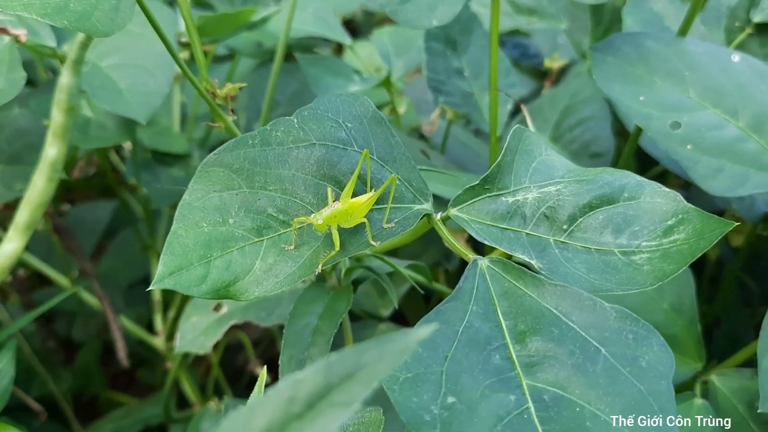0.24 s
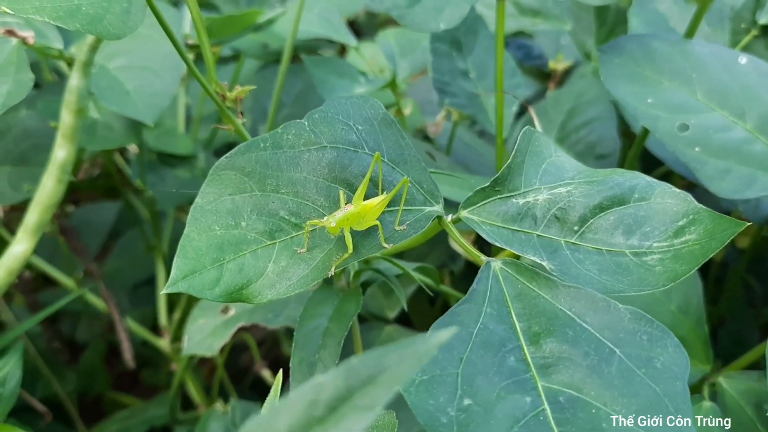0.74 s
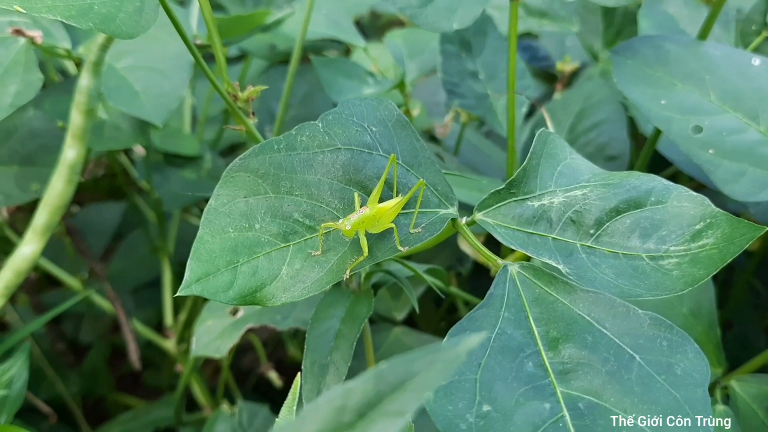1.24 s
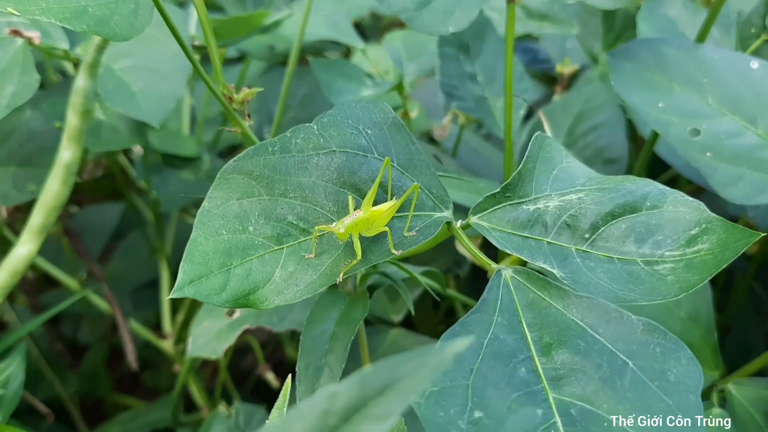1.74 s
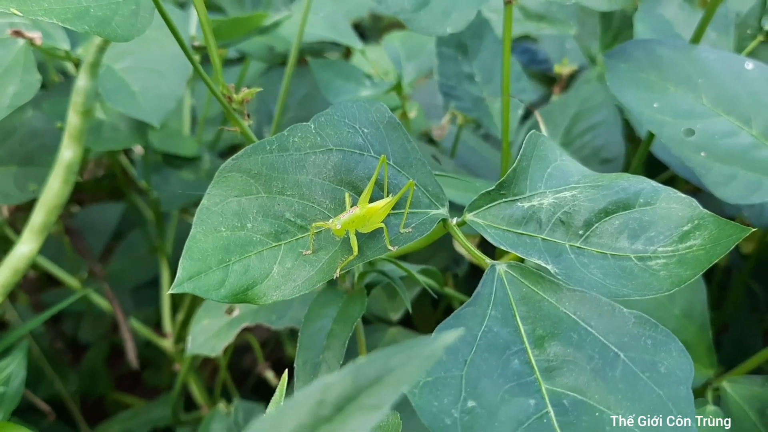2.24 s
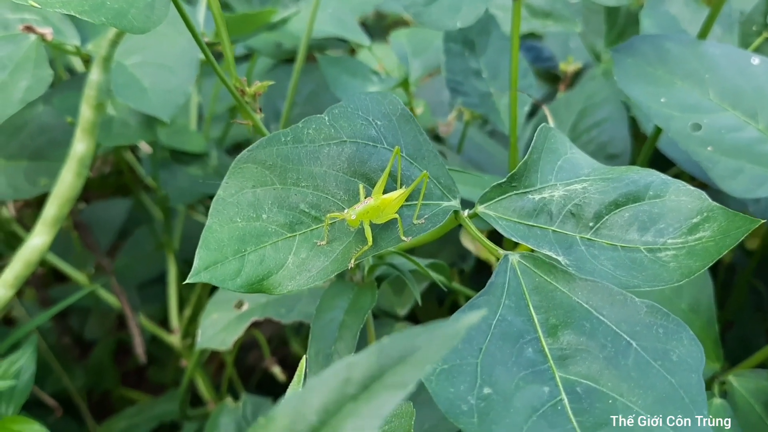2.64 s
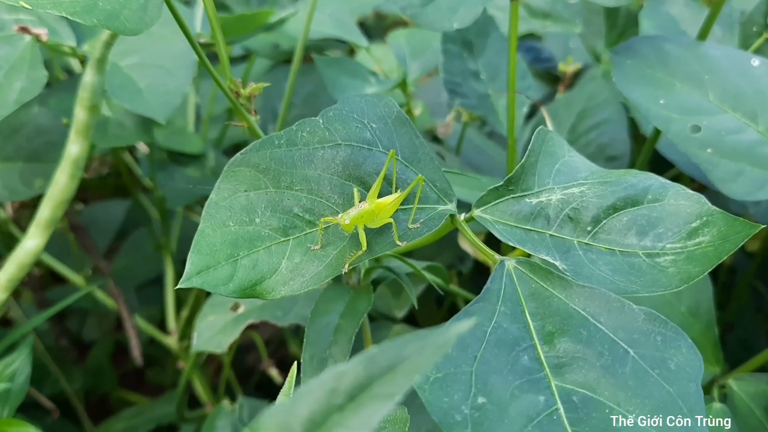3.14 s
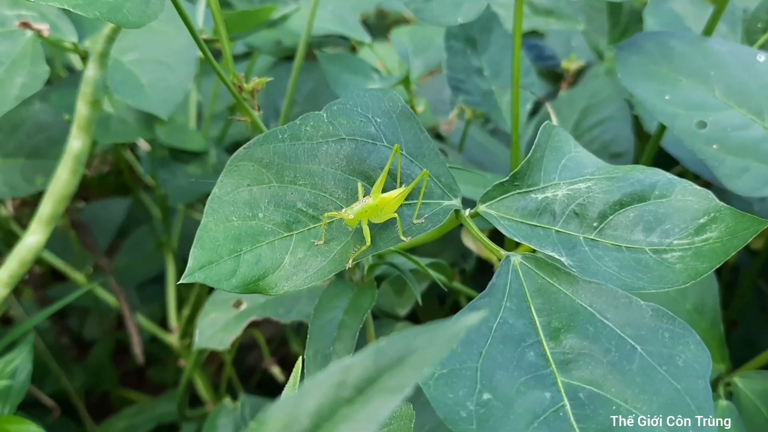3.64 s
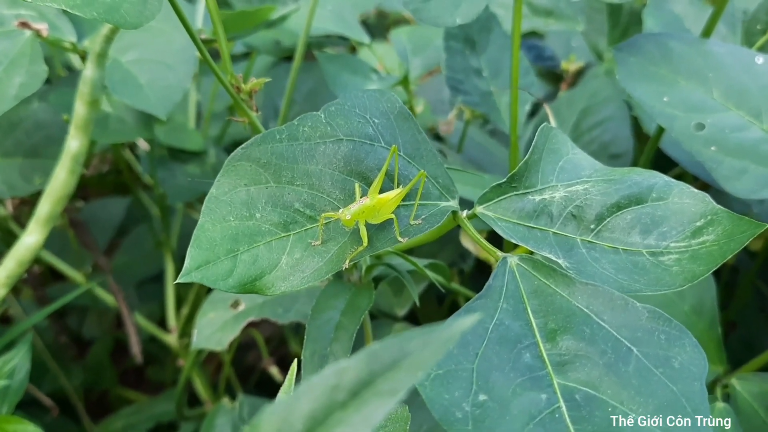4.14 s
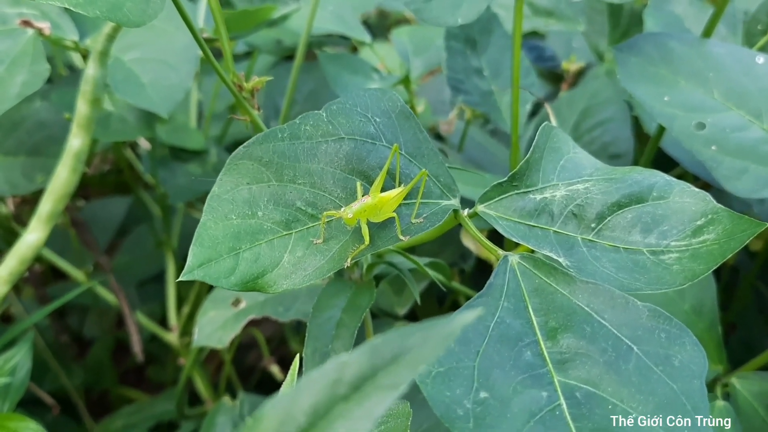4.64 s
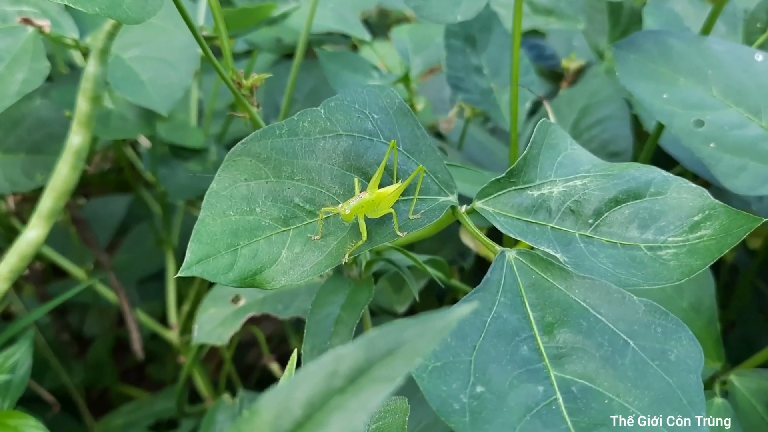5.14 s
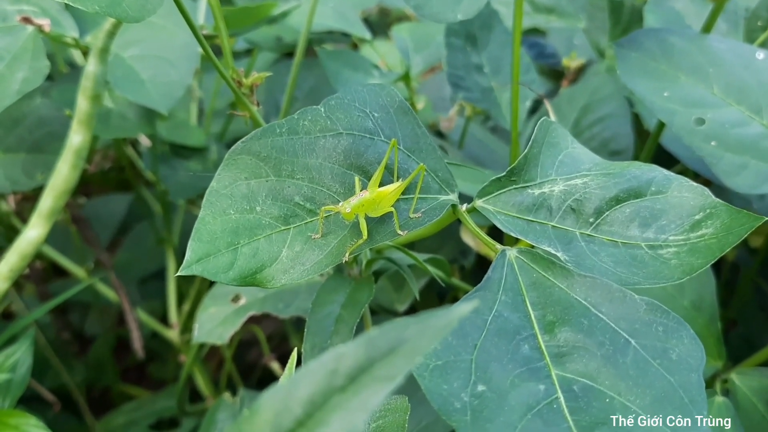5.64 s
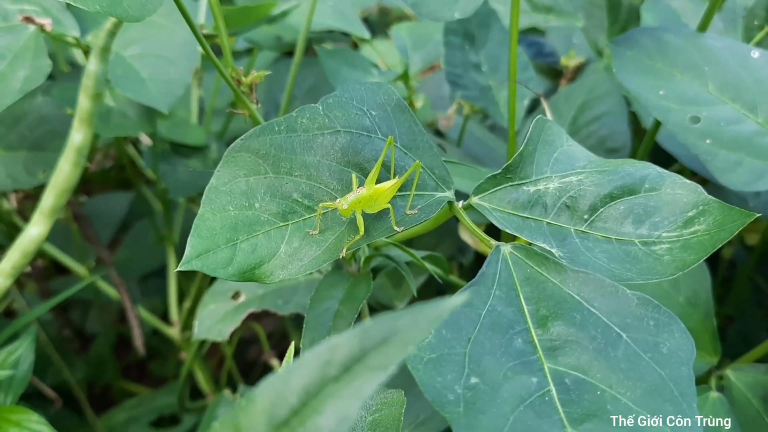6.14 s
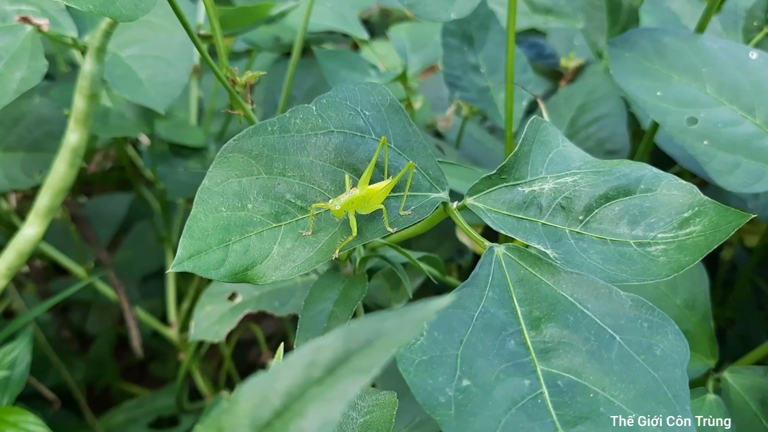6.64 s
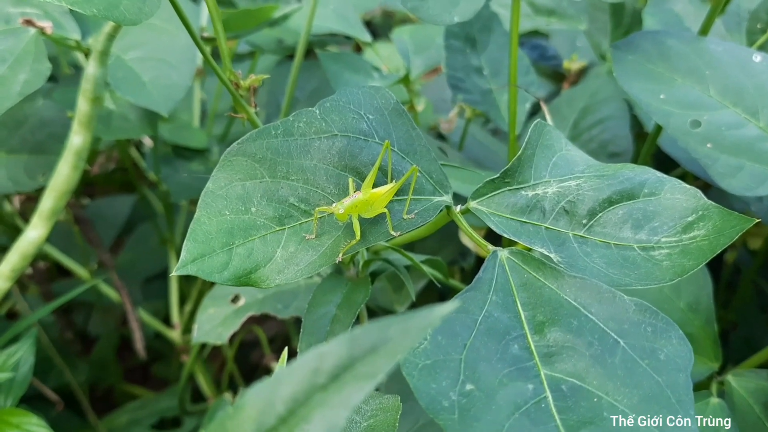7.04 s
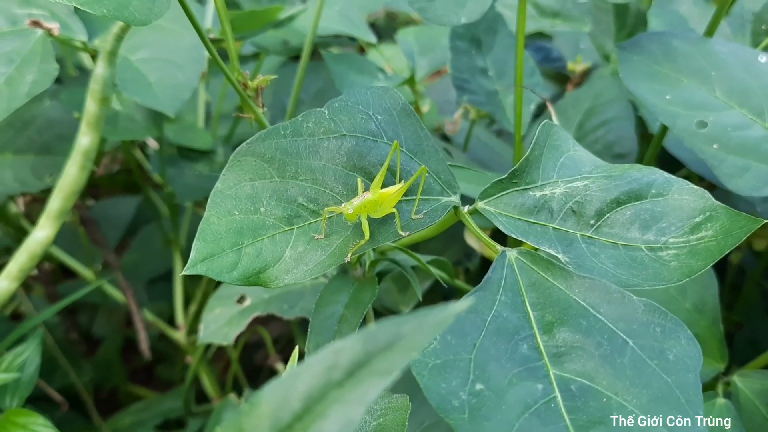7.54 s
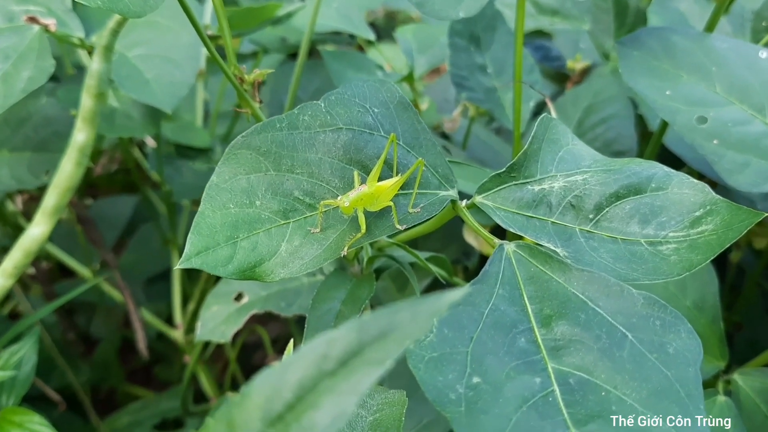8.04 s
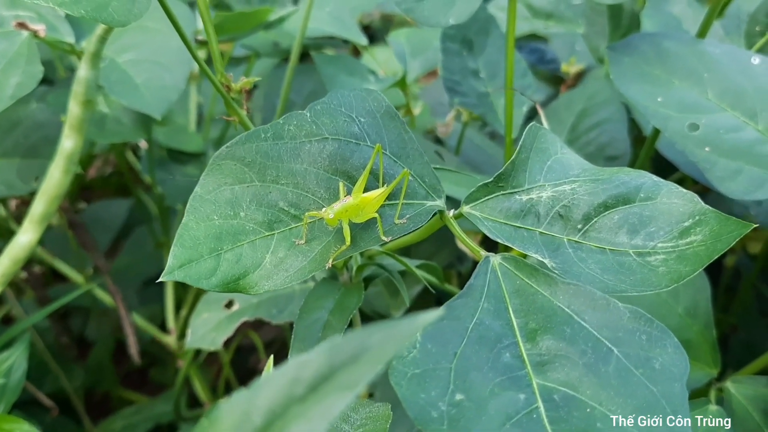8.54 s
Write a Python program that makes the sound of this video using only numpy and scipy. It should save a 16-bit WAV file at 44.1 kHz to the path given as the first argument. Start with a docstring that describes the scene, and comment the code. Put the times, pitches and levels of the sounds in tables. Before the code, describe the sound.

Bright overlapping insect trills and dry, hissy katydid buzzing fill leafy outdoor air, with small leaf rustles and a distant wavering hum.

```python
"""Crickets trill in a garden at close and middle range, each stroke a short near-sine arch of sagging pitch.
Two katydids buzz above: dense random ticks excite broad wing resonances. A far chorus blurs behind them by
scattering, over a lower band of ringing ticks. Leaves rustle now and then as bursts of grainy noise; a far bird
gives hoarse falling glides. A distant motor hum, a wavering sine, swells over low traffic-like rumble made of
filtered noise, and one soft low tone swells and fades. A handheld pair of microphones hears it in stereo."""
import sys
import numpy as np
from scipy import signal
from scipy.fft import rfft, irfft
from scipy.io import wavfile
from scipy.ndimage import uniform_filter1d

SR = 44100
rng = np.random.default_rng(int(sys.argv[2]) if len(sys.argv) > 2 else 0)


def master_out(mix):
    """Clip the mix to full scale and print it as 16-bit PCM to the path in sys.argv[1]."""
    frames = np.transpose(np.atleast_2d(mix))
    ceiling = np.clip(frames, -1, 1)
    pcm = np.round(ceiling * 32767).astype(np.int16)
    wavfile.write(sys.argv[1], SR, pcm)


def natural_amplitude(level_db):
    """Convert a level in decibels to a linear amplitude factor, elementwise."""
    exponent = np.asarray(level_db, float) / 20
    return 10 ** exponent


N = 387462

# Place and wing stroke of six crickets. Each row: left-right level in dB, phase lead of the left in radians,
# delay of the right in ms, strokes per s, stroke length in ms, flatness of the stroke's top.
CRICKETS = [(-17, -2.3, 0, 26.4, 18.0, 1.3), (-4, -2.4, 2.8, 28.95, 20.0, .9),
            (-3, 2.5, 0, 27.5, 20.0, 1.2), (4, 2.1, 0, 26.18, 20.0, 1.2), (-1.5, -2.1, 0, 27.75, 20.0, 1.2),
            (-3.5, -.6, 0, 26.07, 20.0, 1.2)]
# Pitches of the six crickets in Hz.
CRICKET_PITCHES_HZ = [7735.0, 8178.0, 7580.0, 7366.0, 7742.0, 7893.0]
# Trills, one list a cricket. Each row: first full stroke in seconds, last stroke in seconds,
# stroke peak in dB at the start, stroke peak in dB at the end.
TRILLS = [
    [(0.0306, 0.7122, -30.5, -30.5), (1.1657, 5.028, -31.5, -29), (5.4474, 7.0405, -29.5, -30)],
    [(0.0255, 0.7517, -36, -36), (1.3098, 4.4914, -37, -36), (4.9511, 7.1934, -36, -35)],
    [(0.017, 2.4184, -38, -37.5), (3.7181, 5.1774, -37, -36.5), (5.3253, 6.5935, -35.5, -35.5),
     (7.2146, 8.3417, -37, -38.5)],
    [(0.6342, 2.4295, -53, -53), (3.2322, 4.6848, -50, -50)],
    [(5.5241, 7.0719, -41.5, -41.5), (7.6135, 8.7683, -44, -44)],
    [(0.0332, 1.2635, -44.5, -44.5), (1.9222, 4.6829, -44.5, -46.5)],
]
# Each stroke leading into a trill is this much lower and softer than the next.
WARM_UP_HZ, WARM_UP_DB = 54, 2.5
# Echoes off leaves and ground. Each row: delay in ms, left level in dB, right level in dB.
ECHOES = [(8.0, -18.5, -17)]
SCATTER_DB, SCATTER_T60_S = -16, .12  # diffuse return from the foliage

# Katydid phrases, one list an insect. Each row: first chirp in seconds, last chirp in seconds, chirps per s.
BUZZES = [
    [(.0086, 5.5733, 21.2), (5.619, 8.779, 20.89)],
    [(5.1055, 7.069, 21.9), (7.1147, 8.773, 21.71)],
]
# Loudness of the two katydids ahead of the beat pattern. Each row: time in seconds, level in dB.
BUZZ_LEVELS = [
    [(0, -45), (1, -46.5), (5, -45.5), (6.5, -47.5), (8.79, -50.5)],
    [(5.1, -68), (5.5, -50), (5.8, -45.5), (6.5, -44.5), (7.2, -44), (8, -42), (8.79, -43.5)],
]
# Relative wing colour, one list an insect. Each row: frequency in Hz, left in dB per Hz, right in dB per Hz.
WINGS = [
    [(9000, -22, -28), (10100, -15, -23), (11000, -9, -11.5), (11600, -7, -11), (12300, -1.5, -8.5),
     (13300, -3.5, -12), (14000, -3, -12.5), (14600, -.5, -10.5), (15600, -.5, -9)],
    [(9000, -20, -22), (10100, -14, -16), (11100, -7, -15), (11600, -8, -12), (12500, -1.5, -6.5),
     (13500, 0, -15), (14500, -2, -12), (15000, 1, -10), (15600, -1.5, -7.5)],
]
# Strength of the four wing beats of a chirp in dB.
WING_BEATS_DB = [-1.5, 0, -.5, -6]

# Colour of the far chorus. Each row: pitch in Hz, relative level in dB, left-right level in dB.
FAR_COLOUR = [(6870, -23, 2), (7195, -2, -9.5), (7490, 1, 4.5), (7510, 7.5, 4.5), (7690, 2.5, -8),
              (7970, -1, -9), (8020, -3, 3), (8130, -9, -13), (8930, -11, -5), (8660, -20, 12)]
# Loudness of the far chorus. Each row: time in seconds, level in dB.
FAR_LEVEL = [(0, -44.5), (.9, -49.5), (3, -45.5), (4.7, -47), (5.7, -46), (6.9, -47.5), (7.4, -48.5),
             (8.2, -48.5), (8.79, -51)]
FAR_T60_S, FAR_PHRASE_S, FAR_REST_S = .3, 1.6, .4

LOW_CHORUS_HZ, LOW_CHORUS_WIDTH_HZ, LOW_CHORUS_TICKS_PER_S = 4650, 500, 1500
# Mean loudness of the low chorus. Each row: time in seconds, level in dB.
LOW_CHORUS_LEVEL = [(0, -66), (1, -67.5), (2.5, -67), (3.05, -67), (3.25, -63), (3.45, -66), (3.8, -68),
                    (4.5, -66.5), (5.4, -66), (6.1, -62.5), (6.5, -68.5), (8.4, -63), (8.79, -69)]

# Leaf rustles. Each row: start in seconds, level in dB before the envelope, length scale in s, centre in Hz.
RUSTLES = [(0.13, -53.5, 0.2, 3800), (0.535, -52, 0.06, 3600), (0.687, -58, 0.11, 1500),
           (0.75, -60, .08, 1000), (0.85, -48, 0.15, 2100), (1.91, -53, 0.1, 3800), (2.188, -41, .04, 8000),
           (2.71, -57, .02, 4500), (3.36, -57, .02, 4500), (4.674, -50, 0.041, 4500),
           (5.56, -56, .05, 4000), (5.875, -45, .02, 8000), (5.929, -49.5, 0.083, 4170),
           (6.378, -52, .012, 13000), (7.35, -57, 0.052, 4000), (7.495, -52, 0.022, 6000),
           (8.19, -42, 0.04, 9000), (8.25, -57, .06, 2600), (8.33, -57, .15, 2600), (8.5, -54, .03, 6000)]

# Loudness of the hum before its waver. Each row: time in seconds, level in dB.
HUM_LEVEL = [(0.0, -83), (1.3, -91), (1.45, -61), (3.1, -62.5), (3.6, -57), (3.95, -59), (4.15, -53),
             (6.3, -50), (7.1, -56), (8.79, -55.5)]
HUM_HZ, HUM_PAN_DB, HUM_LEAD_RAD = 216.7, 2.5, -0.59  # pan and phase lead: left against right
HUM_WAVER_DB, HUM_WAVER_PER_S = 1.5, 3.5
UPPER_HUM_HZ, UPPER_HUM_WIDTH_HZ, UPPER_HUM_DB = 294.6, 12, -68.5

# Falling calls of a far bird. Each row: start in seconds, length in s, from Hz, to Hz, level in dB.
BIRD_CALLS = [(3.52, 0.2, 3730, 3220, -71), (6.0, .25, 3600, 3150, -72), (7.62, 0.38, 4150, 3050, -63),
              (8.22, .1, 3300, 2700, -65), (8.4, .14, 4300, 3700, -66)]
# A soft, blurred low tone. One row: start in seconds, length in s, centre in Hz, width in Hz, level in dB.
SOFT_TONE = (1.17, .4, 620, 90, -71)

# Colour of the outdoor noise. Each row: frequency in Hz, relative level in dB per Hz.
AIR_COLOUR = [(15, -65), (25, -28), (59, -11.5), (143, -9.5), (213, -9.5), (233, -3), (250, -12.5),
              (294, -13), (355, -19.5), (398, -24.5), (491, -25.5), (1430, -33), (3630, -30), (4590, -25),
              (6500, -26.5), (8450, -23), (14300, -120)]
AIR_DB = -54.5
# Course of the rumble in the upper bass, used about its mean. Each row: time in seconds, level in dB.
RUMBLE = [(0.0, -65.5), (3.3, -66), (4.3, -62), (6.3, -59), (7.2, -62), (8.79, -62.5)]
# Course of the outdoor noise in the low mids, used about its mean. Each row: time in seconds, level in dB.
MURMUR = [(0.0, -71.5), (0.55, -73), (0.85, -65.5), (1.15, -72), (2.0, -74), (8.79, -73)]
# Correlation of the outdoor noise at the two microphones. Each row: frequency in Hz, left-right likeness.
LIKENESS = [(60, 0.72), (150, 0.98), (380, 0.41), (950, -0.4), (2380, 0.12), (5980, -0.27), (15000, 1)]
# Sideways balance of the outdoor noise. Each row: frequency in Hz, left-right level in dB.
LEAN = [(60, 2.5), (450, 4.0), (1200, 2.5), (2000, -.5), (5500, -3.5)]

CUTOFF_HZ = 15750


def rms_one(x):
    """Normalisation: scale to unit rms."""
    return x / np.sqrt(np.mean(x ** 2) + 1e-20)


def in_time(rows):
    """Linear interpolation through (seconds, value) rows."""
    return np.interp(np.arange(N) / SR, *np.transpose(rows))


def at_hz(points, hz):
    """Linear interpolation on a log-frequency axis."""
    points = np.array(points)
    return np.interp(np.log(hz), np.log(points[:, 0]), points[:, 1])


def drift(rate_hz):
    """Random modulation: low-passed noise of unit rms, made at SR / 40 and interpolated."""
    r = np.exp(-80 * np.pi * rate_hz / SR)
    noise = rng.standard_normal(N // 40 + 2002)
    slow = signal.lfilter([1], [1, -2 * r, r * r], noise)[2000:]  # drop the filter's start
    return np.interp(np.arange(N) / 40, np.arange(len(slow)), rms_one(slow))


def resonance(x, hz, width_hz):
    """Damped resonator: a two-pole peak with gain near 1 on top."""
    r = np.exp(-np.pi * width_hz / SR)
    zeros = np.array([1, 0, -1]) * (1 - r * r) / 2
    return signal.lfilter(zeros, [1, -2 * r * np.cos(2 * np.pi * hz / SR), r * r], x)


def beats(first, last, per_s):
    """Periodic excitation: evenly spaced moments from first to last."""
    return np.linspace(first, last, round((last - first) * per_s) + 1)


def add(track, sound, centre_s):
    """Superposition: lay a sound into a track, centred on a moment."""
    at = round(centre_s * SR) - sound.shape[-1] // 2 + np.arange(sound.shape[-1])
    keep = (at >= 0) & (at < N)
    track[..., at[keep]] += sound[..., keep]


def trill(rows, length_ms, flatness, vary_db=1.0, vary_hz=14.0):
    """Stridulation: each stroke is a near-sine arch sagging in pitch, roughened by uneven file teeth."""
    glide_hz, rough, rough_hz = 90.0, .1, 280
    out = np.zeros(N, complex)  # complex, so a phase can be turned
    u = np.linspace(0, 1, round(length_ms * SR / 1000))
    arch = np.tanh(flatness * np.sin(np.pi * u) ** 2) / np.tanh(flatness)
    for first, last, per_s, hz, first_db, last_db in rows:
        times = beats(first, last, per_s)
        levels_db = np.linspace(first_db, last_db, len(times))
        chances = rng.standard_normal((len(times), 3))
        for s, db, (loud, off, turn) in zip(times, levels_db, chances):
            pitch = hz + vary_hz * off - glide_hz * (u - .5)
            phase = 2 * np.pi * np.cumsum(pitch) / SR + 10 * turn
            add(out, natural_amplitude(db + vary_db * loud) * arch * np.exp(1j * phase), s)
    lowpass = signal.butter(2, rough_hz, fs=SR, output="sos")
    teeth = signal.sosfilt(lowpass, rng.standard_normal((2, N)))
    return out * (1 + rough * rms_one(teeth[0]) + 1j * rough * rms_one(teeth[1]))


def scattered(song, t60, sway=1.0):
    """Multiple scattering: foliage smears a complex sound; swaying leaves keep turning its phase."""
    t = np.arange(round(t60 * SR)) / SR
    paths = rng.standard_normal((2, len(t))) * natural_amplitude(-60 * t / t60)
    paths = paths / np.sqrt(np.sum(paths ** 2) / 2)
    smeared = signal.fftconvolve(song[None], paths, axes=1)[:, :N]
    return np.real(smeared * np.exp(1j * sway * np.array([drift(8), drift(8)])))


def crickets(count=4):
    """Direct and reflected sound: trills with a warm-up, stereo level and phase, an echo and a diffuse return."""
    out = np.zeros((2, N))
    for place, hz, trills in zip(CRICKETS, CRICKET_PITCHES_HZ, TRILLS):
        pan_db, lead, later_ms, per_s, length_ms, flatness = place
        rows = []
        for first, last, first_db, last_db in trills:
            rows.append((first, last, per_s, hz, first_db, last_db))
            for k in range(1, count + 1):  # single warm-up strokes, counted back from the trill
                s, db = first - k / per_s, first_db - k * WARM_UP_DB
                rows.append((s, s, per_s, hz - k * WARM_UP_HZ, db, db))
        song = trill(rows, length_ms, flatness)
        left = natural_amplitude(min(pan_db, 0)) * np.exp(1j * lead) * song
        right = natural_amplitude(min(-pan_db, 0)) * np.roll(song, round(later_ms * SR / 1000))
        out += np.real([left, right])
        out += natural_amplitude(SCATTER_DB) * scattered(song, SCATTER_T60_S)
        for delay_ms, left_db, right_db in ECHOES:
            lag = round(delay_ms * SR / 1000)
            out[:, lag:] += natural_amplitude([[left_db], [right_db]]) * song.real[:N - lag]
    return out


def katydids():
    """Impulsive excitation: dense tooth ticks ring broad wings; three strong beats and a weak one make a chirp."""
    spike_db, floor_db, ticks_per_s = 1.5, 3.0, 16000
    out = np.zeros((2, N))
    freqs = np.fft.rfftfreq(N, 1 / SR) + 1
    bandpass = signal.butter(4, [8800, 17000], "band", fs=SR, output="sos")
    for rows, level, wings in zip(BUZZES, BUZZ_LEVELS, WINGS):
        gate = np.zeros(N)
        for first, last, per_s in rows:
            beat = natural_amplitude(floor_db) + np.hanning(round(SR / per_s / 4))  # the floor sounds on between beats
            chirp = np.concatenate([natural_amplitude(beat_db) * beat / 2 for beat_db in WING_BEATS_DB])
            for s in beats(first, last, per_s):
                # the listed moment falls on the second beat
                add(gate, natural_amplitude(.7 * rng.standard_normal()) * chirp, s + 1 / per_s / 8)
        sizes = natural_amplitude(spike_db * np.minimum(rng.exponential(1, (2, N)), 4))
        sizes = sizes * rng.choice([-1, 1], (2, N))
        ticks = sizes * (rng.random((2, N)) < ticks_per_s / SR)
        colour_db = np.array([at_hz(np.array(wings)[:, [0, side]], freqs) for side in (1, 2)])
        buzz = signal.sosfilt(bandpass, irfft(rfft(ticks) * natural_amplitude(colour_db), N))
        buzz = buzz / np.std(buzz[0])
        out += buzz * uniform_filter1d(gate, size=90) * natural_amplitude(in_time(level) + 1.0 * drift(2.6))
    return out


def far_crickets(count=40):
    """Incoherent superposition: many singers, loudest mid-band, blur together; their pitches lean left or right."""
    pitches = np.linspace(FAR_COLOUR[0][0], FAR_COLOUR[-1][0], count)
    cycle_s = FAR_PHRASE_S + FAR_REST_S
    starts, rates = rng.uniform(0, cycle_s, count), rng.uniform(25, 29, count)
    rounds = np.arange(-1, N / SR / cycle_s) * cycle_s
    rows = []
    for start, per_s, hz in zip(starts, rates, pitches):
        db = at_hz(FAR_COLOUR, hz)
        rows += [(start + k, start + k + FAR_PHRASE_S, per_s, hz, db, db) for k in rounds]
    song = scattered(trill(rows, 14.0, .8, vary_db=3.0, vary_hz=70.0), FAR_T60_S)
    lean_db = at_hz(np.array(FAR_COLOUR)[:, [0, 2]], np.fft.rfftfreq(N, 1 / SR) + 1)
    leaning = irfft(rfft(song) * natural_amplitude(lean_db * [[.5], [-.5]]), N)
    return natural_amplitude(in_time(FAR_LEVEL)) * rms_one(leaning)


def low_chorus():
    """Resonant filtering: uneven ticks of far, lower-pitched insects, too many to tell apart, ring in one band."""
    sizes = rng.standard_normal((2, N)) * natural_amplitude(1.1 * np.array([drift(25), drift(23)]))
    hiss = sizes * (rng.random((2, N)) < LOW_CHORUS_TICKS_PER_S / SR) + 1e-18
    for _ in range(2):
        hiss = resonance(hiss, LOW_CHORUS_HZ, LOW_CHORUS_WIDTH_HZ)
    balance_db = np.array([[-1.5], [1.5]])
    return rms_one(hiss) * natural_amplitude(in_time(LOW_CHORUS_LEVEL) + 1.2 * drift(6) + 1.6 * drift(1.5) + balance_db)


def rustles(spike_db=3.3):
    """Friction noise: brushing leaves give a burst of grains, quick to rise, broad in colour."""
    out = np.zeros((2, N))
    for s, db, length_s, hz in RUSTLES:
        u = np.linspace(0, 3, round(3 * length_s * SR))
        spikes = natural_amplitude(spike_db * np.minimum(rng.exponential(1, len(u)), 2.5))
        grains = rng.standard_normal((2, len(u))) * spikes
        colour = signal.butter(2, [hz / 2.4, min(hz * 2.4, 18000)], "band", fs=SR, output="sos")
        envelope = np.minimum(u / 0.28, 1) * np.exp(-1.5 * u)
        add(out, natural_amplitude(db) * rms_one(signal.sosfilt(colour, grains)) * envelope, s + 1.3 * length_s)
    return out


def hum():
    """Propagation through air: a distant tone swells and wavers, with a blurred fainter one above it."""
    sides = np.array([[.5], [-.5]])
    phase = 2 * np.pi * HUM_HZ * np.arange(N) / SR + 0.24 * drift(0.58)
    level = natural_amplitude(in_time(HUM_LEVEL) + HUM_WAVER_DB * drift(HUM_WAVER_PER_S))
    tone = np.sqrt(2) * level * np.sin(phase + HUM_LEAD_RAD * sides)
    upper = rms_one(resonance(rng.standard_normal(N), UPPER_HUM_HZ, UPPER_HUM_WIDTH_HZ))
    return (tone + natural_amplitude(UPPER_HUM_DB) * upper) * natural_amplitude(HUM_PAN_DB * sides)


def bird(rough_hz=170.0):
    """Amplitude modulation: a falling sine shaken by slow noise sounds hoarse; distance blurs it."""
    out = np.zeros(N, complex)
    lowpass = signal.butter(2, rough_hz, fs=SR, output="sos")
    for s, length_s, from_hz, to_hz, db in BIRD_CALLS:
        glide = np.linspace(from_hz, to_hz, round(length_s * SR))
        shake = rms_one(signal.sosfilt(lowpass, rng.standard_normal(len(glide))))
        envelope = np.hanning(len(glide)) ** .5 * (.5 + shake)
        call = envelope * np.exp(2j * np.pi * np.cumsum(glide) / SR)
        add(out, natural_amplitude(db) * call, s + length_s / 2)
    return scattered(out, .06)


def soft_tone():
    """Narrow-band noise: a brief resonant band swells and fades."""
    s, length_s, hz, width_hz, db = SOFT_TONE
    out, swell = np.zeros(N), np.hanning(round(length_s * SR)) ** .5
    noise = resonance(resonance(rng.standard_normal(len(swell)), hz, width_hz), hz, width_hz)
    add(out, natural_amplitude(db) * swell * rms_one(noise), s + length_s / 2)
    return out


def air(patchy_db=2.0):
    """Partly coherent noise: third-octave bands; upper bass follows the rumble, low mids the murmur."""
    out, edges = 0, 22 * 2 ** np.arange(0, 8.7, 1 / 3)
    white = rng.standard_normal((2, 2, N))
    rumble, murmur = in_time(RUMBLE), in_time(MURMUR)
    for k, (low, high) in enumerate(zip(edges, edges[1:])):
        bandpass = signal.butter(2, [low, high], "band", fs=SR, output="sos")
        mid, side = signal.sosfilt(bandpass, white[k % 2])  # neighbouring bands use separate noises
        hz = np.sqrt(low * high)
        alike = np.clip(at_hz(LIKENESS, hz), -1, 1)
        level_db = at_hz(AIR_COLOUR, hz) + patchy_db * drift(13.1)
        level_db = level_db + (rumble - rumble.mean()) * (100 < hz < 350)
        level_db = level_db + (murmur - murmur.mean()) * (350 < hz < 1500)
        lean = natural_amplitude(at_hz(LEAN, hz) * np.array([[.5], [-.5]]))
        stereo = np.sqrt(1 + alike) * mid + np.sqrt(1 - alike) * side * [[1], [-1]]
        out = out + natural_amplitude(level_db) * lean * stereo
    return natural_amplitude(AIR_DB) * rms_one(out)


def scene():
    """Linear superposition of all sources at the two microphones."""
    insects = crickets() + katydids() + far_crickets() + low_chorus()
    return insects + rustles() + hum() + bird() + soft_tone() + air()


def band_limit(x):
    """A steep low-pass at the top of the band."""
    return signal.sosfilt(signal.butter(12, 16780, fs=SR, output="sos"), x)


def record(dry):
    """Band limitation: a steep low-pass cuts the top of the mix."""
    lowpass = signal.ellip(16, .5, 80, CUTOFF_HZ, fs=SR, output="sos")
    mix = signal.sosfilt(lowpass, dry)
    return band_limit(mix)


dry = scene()
out = record(dry)
master_out(out)
```